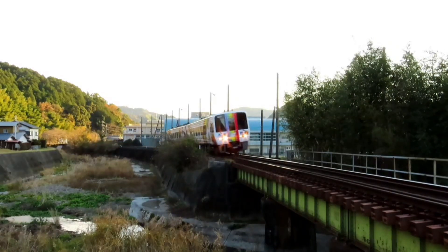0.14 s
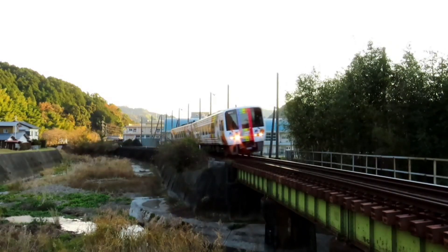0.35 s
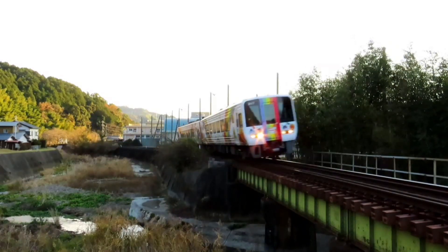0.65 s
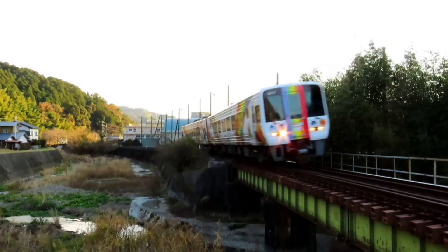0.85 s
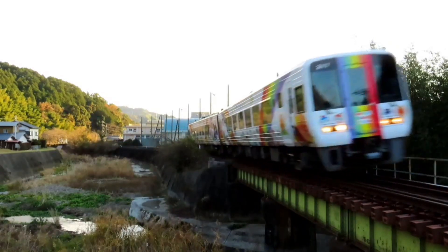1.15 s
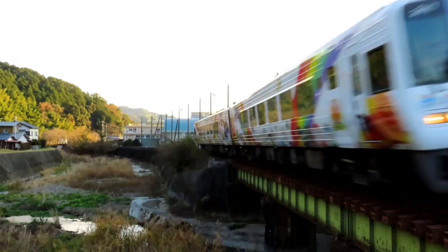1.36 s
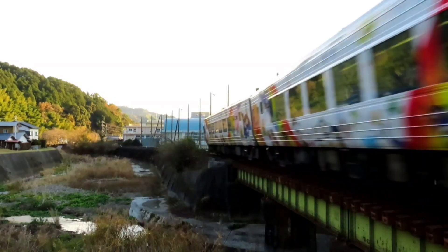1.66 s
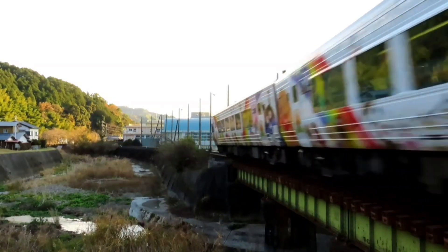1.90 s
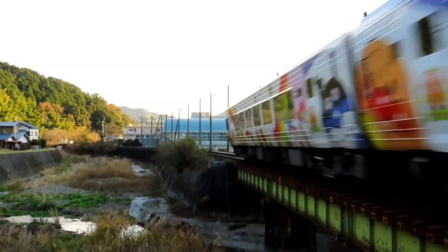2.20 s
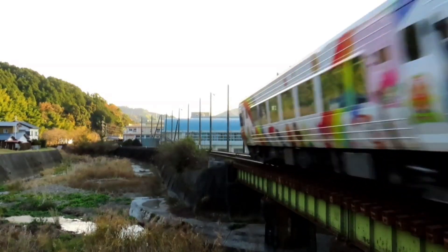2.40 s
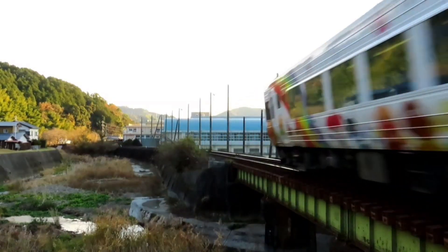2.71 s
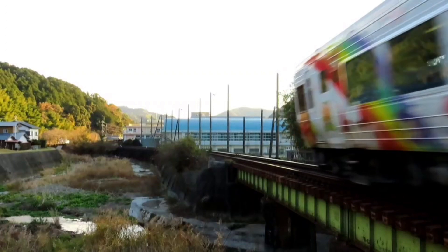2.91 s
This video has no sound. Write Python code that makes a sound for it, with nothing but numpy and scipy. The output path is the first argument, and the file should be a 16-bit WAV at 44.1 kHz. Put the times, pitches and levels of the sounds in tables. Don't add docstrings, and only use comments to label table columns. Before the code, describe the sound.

A diesel train approaches with rolling roar, low exhaust drone and thin, very high turbo hiss and whistle. Around 0.5 seconds the rail sings metallically; from 0.7 seconds heavy wheel knocks come about ten a second, with gritty clacks and hollow girder booms. It passes close on the right, loudest around 0.7 to 1.8 seconds, then engine and hiss fade while sharper clatter continues, weakening until 3 seconds.

```python
import sys
import numpy as np
from scipy import signal
from scipy.fft import rfft, irfft
from scipy.io import wavfile

SR = 44100
rng = np.random.default_rng(int(sys.argv[2]) if len(sys.argv) > 2 else 0)


def natural_amplitude(level_db):
    exponent = np.asarray(level_db, float) / 20
    return 10 ** exponent


def waveform_to_disk(signal):
    frames = np.transpose(np.atleast_2d(signal))
    scaled = np.clip(frames, -1, 1) * 32767
    samples = np.round(scaled).astype(np.int16)
    wavfile.write(sys.argv[1], SR, samples)


N = 134505
TIME_S = np.arange(N) / SR


def rms_one(x):
    return x / np.sqrt(np.mean(x ** 2) + 1e-20)


def in_time(rows):
    s, *columns = np.transpose(rows)
    return [np.interp(TIME_S, s, c) for c in columns]


def at_hz(points, hz):
    table_hz, table_db = np.transpose(points)
    return np.interp(np.log(hz), np.log(table_hz), table_db)


def drift(rate_hz):
    r = np.exp(-80 * np.pi * rate_hz / SR)
    slow = signal.lfilter([1], [1, -2 * r, r * r], rng.standard_normal(N // 40 + 2002))[2000:]
    return np.interp(np.arange(N) / 40, np.arange(len(slow)), rms_one(slow))


def coloured(x, spectrum):
    hz = np.maximum(np.fft.rfftfreq(N, 1 / SR), 1)
    low = np.minimum(hz / spectrum[0][0], 1) ** 2
    high = np.minimum(spectrum[-1][0] / hz, 1) ** 2
    return irfft(rfft(x) * natural_amplitude(at_hz(spectrum, hz)) * low * high, N)


def noise(spectrum, flicker_db):
    return rms_one(coloured(rng.standard_normal(N) * natural_amplitude(flicker_db * drift(7.5)), spectrum))


def resonant(table, patchy_db, rate_hz, passes=1):
    out = 0
    for hz, width_hz, db in table:
        r = np.exp(-np.pi * width_hz / SR)
        x = rng.standard_normal(N + 4000)
        for _ in range(passes):
            x = signal.lfilter([1, 0, -1], [1, -2 * r * np.cos(2 * np.pi * hz / SR), r * r], x)
        out = out + natural_amplitude(db + patchy_db * drift(rate_hz)) * rms_one(x[4000:])
    return rms_one(out)


# pitch_hz, level_db
TURBO_HISS = [(3530, -50), (6000, -30), (9500, -14), (11500, -10), (12200, -4), (13300, -2), (13900, 1),
              (14300, 3)]
# pitch_hz, width_hz, level_db
WHISTLES = [(14185, 25, -2), (13950, 120, -5), (12700, 40, -7)]


def turbo(level_db, abeam):
    patchy_db = 2.5
    whistle = resonant(WHISTLES, patchy_db, rate_hz=2.9, passes=2)
    opposed = natural_amplitude(level_db) * (noise(TURBO_HISS, flicker_db=1.5) + natural_amplitude(-3) * whistle)
    whistle = resonant(WHISTLES[:2], patchy_db, rate_hz=5, passes=2)
    alike_db = level_db - 7 - 10 * abeam + 1.5 * drift(8)
    alike = natural_amplitude(alike_db) * (noise(TURBO_HISS, flicker_db=1.5) + .9 * whistle)
    return opposed, alike


# time_s, firing_tone_db, second_order_db, body_boom_db
ENGINE = [(0, -21.5, -29.5, -24), (.22, -18, -23.5, -23), (.36, -24.5, -27.5, -22.5),
          (.46, -22, -28, -21.5), (.55, -29, -33, -18), (.7, -18, -32, -22.5), (.88, -33, -28, -23),
          (1.08, -29, -19.5, -23), (1.3, -24.5, -20.5, -24.5), (1.55, -27.5, -28, -27),
          (1.8, -31, -38, -23.5), (2.08, -44, -34, -31.5), (2.25, -28.5, -22, -19.5),
          (2.5, -40, -54, -32.5), (2.85, -43, -29, -28), (3.05, -36, -40.5, -40)]


def engine():
    firing_db, second_db, boom_db = in_time(ENGINE)
    firing_hz = 84.3 * (1 + .01 * drift(6))
    turn = 2 * np.pi * np.cumsum(firing_hz) / SR
    tones = natural_amplitude(firing_db + 0.76 * drift(7.7)) * np.sin(turn)
    tones += natural_amplitude(second_db + 1.3 * drift(5.5)) * np.sin(2 * turn + 0.49 * drift(18.5))
    ninth_db = -34 - 40 * np.maximum(TIME_S - .5, 0) + 1.5 * drift(9)
    tones += natural_amplitude(ninth_db) * np.sin(9 * turn)
    body = [(84.0, 55, -2), (111.8, 18.6, 3.0), (132.0, 62, -1.5), (153.5, 60, 0.5)]
    boom = natural_amplitude(boom_db) * resonant(body, patchy_db=1.0, rate_hz=11.0, passes=2)
    throb_db = firing_db - 12 - 13 * np.clip(TIME_S - .7, 0, 1)
    throb = natural_amplitude(throb_db) * resonant([(29.6, 14, 1), (49.7, 41, 4)], patchy_db=2, rate_hz=4, passes=2)
    return np.sqrt(2) * tones + boom + throb


# time_s, level_db
SINGING = [(0, -45), (.45, -27.5), (.54, -19), (.6, -17), (.65, -17), (.7, -20), (.8, -21.5), (1.2, -25),
           (1.9, -27.5), (3.05, -32.5)]
# pitch_hz, width_hz, level_db
RAIL = [(998, 23.5, 1.5), (1112, 59, 3), (1315, 74, -2), (1600, 155, -7.5), (1920, 230, -7.5)]


def singing_rail():
    level_db, = in_time(SINGING)
    return natural_amplitude(level_db - 1) * resonant(RAIL, patchy_db=2.0, rate_hz=18.0)


# time_s, roar_db, girder_load_db
ROLLING = [(0, -30, -32), (.16, -28, -35), (.27, -24.5, -52), (.42, -27, -26.5), (.56, -27.5, -17.5),
           (.72, -36, -18), (1.08, -28, -18), (1.28, -30, -18.5), (1.5, -34.5, -17), (1.75, -29, -20),
           (2.08, -29, -21), (2.26, -26.5, -19.5), (2.45, -31, -20), (2.66, -35.5, -25), (2.88, -30.5, -26),
           (3.05, -31.5, -38)]
# pitch_hz, level_db
RUMBLE = [(15, -45), (25, -40), (54, -17), (96, -8.5), (140, -16.5), (176, -1), (248, -7), (345, 0.5),
          (900, -11), (1170, -54), (1980, -120)]
# pitch_hz, width_hz, level_db
GIRDERS = [(111, 23, -12), (153.6, 23, -1), (216, 16, -1.5), (300, 22, 0), (340, 7.3, 6), (405, 28, -1),
           (458, 6.3, -21), (544, 37, 3)]


def bridge():
    _, load_db = in_time(ROLLING)
    rumble = natural_amplitude(load_db + 0.5) * noise(RUMBLE, flicker_db=0.0)
    return rumble + natural_amplitude(load_db - 5) * resonant(GIRDERS, patchy_db=0.5, rate_hz=4.5)


# centre_s, pitch_hz, level_db
PLATES = [
    (.6, 305, -10.5),
    (0.801, 299, -10),
    (0.941, 300, -12.5),
    (1.032, 338, -11),
    (1.216, 396, -10),
    (1.411, 561, -15.5),
    (1.861, 370, -12),
    (2.338, 361, -10),
    (2.52, 375, -17.5),
    (2.771, 380, -15),
]


def plates():
    swell_s = 0.017
    waver, rough = 0.65 * drift(35.0), natural_amplitude(2.0 * drift(42.0))
    out = np.zeros(N)
    for s, hz, db in PLATES:
        swell = np.exp(-.5 * ((TIME_S - s) / swell_s) ** 2)
        out += natural_amplitude(db - 0.5) * swell * np.sin(2 * np.pi * hz * TIME_S + waver)
    return rough * out


# pitch_hz, level_db
ROAR = [(240, 0.5), (400, 0), (738, -1.5), (815, -3), (1420, -8), (1910, -9), (3700, -19.5), (5300, -31),
        (10700, -38), (12000, -44), (15600, -83), (22000, -120)]


def wheel_roar():
    roll_db, _ = in_time(ROLLING)
    roar = natural_amplitude(roll_db + 4.5) * noise(ROAR, flicker_db=1.0)
    air = signal.sosfilt(signal.butter(2, 8000, "high", fs=SR, output="sos"), roar)
    screened = np.clip((TIME_S - 1.2) / .2, 0, 1)
    return roar - .45 * screened * air


# start_s, peak_db, girder_share_db, sharp_edge_db
KNOCKS = [(0.2, -8, 6, -9), (0.297, -12, -7, -10), (0.475, -8.5, -1.5, -1), (0.583, -8, -19, -4),
          (0.691, 1, -18, -3), (0.793, -0.5, -24, -10), (0.896, 1.5, -31, -8), (0.99, 1.5, -12, -10),
          (1.1, -1.5, -29, -6), (1.191, -7.5, 7.5, 5), (1.31, -4, -1.5, -1.5), (1.401, -3.5, -11, -2),
          (1.501, -2, -17, -10), (1.61, -1.5, -13, -2), (1.71, 2.5, -7, -16), (1.815, 1.5, -10.5, -11),
          (1.852, -22, 8, -13), (1.923, -13, 0, 8), (2.03, -8, 1, -2), (2.12, -15, 8.5, -5),
          (2.201, -4.5, 4.5, 2), (2.303, -12, 4, 12.5), (2.407, -6, 4, 2), (2.509, -8, 8, -2),
          (2.616, -11.5, 7.5, 11), (2.726, -6.5, 3, 1.5), (2.835, -16, 6, 1)]


def blows(level_db, rise_s, fall_s):
    clicks = np.zeros(N)
    clicks[(np.array(KNOCKS)[:, 0] * SR).astype(int)] = natural_amplitude(level_db)
    t = np.arange(SR // 3) / SR
    shape = (1 - np.exp(-t / rise_s)) * np.exp(-t / fall_s)
    power = signal.fftconvolve(clicks ** 2, (shape / shape.max()) ** 2)[:N]
    return np.sqrt(np.maximum(power, 0))


# pitch_hz, level_db
KNOCK = [(290, -25), (500, 4.5), (1300, -3.5), (1530, -7.5), (1990, -7), (2310, -14), (2600, -15.5),
         (12000, -76), (15600, -91), (22000, -120)]


def joints():
    _, peak_db, girder_db, edge_db = np.transpose(KNOCKS)
    crack = blows(peak_db + edge_db - 14, rise_s=.003, fall_s=.007)
    swell = blows(peak_db - 18, rise_s=0.028, fall_s=0.041)
    thud = blows(peak_db + girder_db - 15.5, rise_s=0.0022, fall_s=0.03)
    damped = [(hz, 3.0 * width_hz, db) for hz, width_hz, db in GIRDERS[2:]]
    knock = (crack + swell) * noise(KNOCK, flicker_db=0.5)
    return knock + thud * resonant(damped, patchy_db=0.5, rate_hz=18.0)


# start_s, peak_db, brightness_db
CLACKS = [(.109, -16, 1), (.167, -14, -1), (0.206, -6, -1), (.213, -16, 5), (.299, -21, 12),
          (.373, -13, -4), (.526, -17, -16), (.67, -4, -20), (0.682, -12.5, 4), (.699, -12, -6.5),
          (0.713, -4, -10.5), (.76, -2, -20), (.792, -1, -21), (.894, -5, -9), (1.001, -13, -3),
          (1.1, -10, -2), (1.135, -3.5, -9), (1.192, -4, -10), (1.208, -0.5, -11), (1.215, -3, -7),
          (1.226, -9, -11), (1.311, -2, -17), (1.334, 1, -20.5), (1.405, -1.5, -17), (1.429, -7.5, -21),
          (1.5, -9, -10), (1.537, -7, -18), (1.609, -0.5, -16), (1.708, -5, -17), (1.816, -5, -11),
          (1.828, -6, -7), (1.853, 1, -18), (1.923, -2, -12), (2.033, -7, -10), (2.121, -14, -15),
          (2.147, -3, -29), (2.203, -14, -11), (2.304, -2, -14), (2.33, -14, -14), (2.407, -8, -8),
          (2.51, -6, -6), (2.586, -4, -19), (2.619, -3, -18.5), (2.626, -4, -16), (2.729, -8, -18),
          (2.744, -7.5, -18), (2.836, -4, -13)]
# pitch_hz, level_db, t60_s
TREAD = [(428, 0, 0.054), (621, -3.5, 0.043), (880, -3, 0.042), (1253, -4.5, 0.062)]
# pitch_hz, level_db, t60_s
TREAD_HIGH = [(1600, 0, .015), (1950, -1, .014), (2350, -2, .012), (2850, -4, .01), (3450, -5, .009),
              (4150, -7, .008), (5000, -10, .007), (6000, -14, .006)]


def clacks():
    low_db, high_db, detune = -11, -10.5, 0.081
    out, t = np.zeros(N + SR), np.arange(SR // 14) / SR
    grit_t = t[:SR // 30]
    for s, db, bright_db in CLACKS:
        modes = [(hz, db + m + low_db, t60) for hz, m, t60 in TREAD]
        modes += [(hz, db + bright_db + m + high_db, t60) for hz, m, t60 in TREAD_HIGH]
        rings = np.zeros(len(t))
        for hz, mode_db, t60 in modes:
            tune, force, sign = rng.standard_normal(3)
            fade = natural_amplitude(mode_db + 2 * force - 60 * t / t60)
            rings += fade * np.sin(2 * np.pi * hz * (1 + detune * tune) * t) * np.sign(sign)
        grit = rng.standard_normal(len(grit_t)) * np.exp(-grit_t / .008)
        hit = signal.fftconvolve(rings, np.r_[.7, .08 * grit])
        start = int(s * SR)
        out[start:start + len(hit)] += hit
    return out[:N]


# pitch_hz, left_lead_rad
LEAD = [(0, 0), (2500, -.25), (4000, -.75), (6000, -1.7), (9400, -3.1), (22050, -3.14)]
# pitch_hz, left_minus_right_db
SHADOW = [(60, 0), (250, -.9), (700, -2.2), (1500, -3), (4000, -2), (9000, 0)]


def at_ports(train, abeam):
    hz = np.fft.rfftfreq(N, 1 / SR)
    lead_rad = np.interp(hz, *np.transpose(LEAD))
    port = natural_amplitude(at_hz(SHADOW, hz + 1) / 2) * np.exp(.5j * lead_rad)
    return [(1 - abeam) * train + abeam * irfft(rfft(train) * p, N) for p in (port, 1 / port)]


# pitch_hz, share_db
SCATTER = [(30, -30), (80, -37.5), (300, -28), (1200, -25.5), (2500, -19.5), (5000, -28), (9000, -8.5),
           (14000, -8.5)]


def echoes(train, scatter_db):
    hz = np.fft.rfftfreq(N, 1 / SR)
    colour = natural_amplitude(at_hz(SCATTER, hz + 1))
    stir = natural_amplitude(scatter_db + 3 * drift(7))
    return [irfft(rfft(np.roll(train, lag)) * colour, N) * stir for lag in (700, 1190)]


# time_s, abeam_share (0-1), turbo_hiss_db, scatter_db
BEARING = [(0, 0.4, -39, 7), (.12, 0.4, -34, -4), (.45, 0.32, -41.5, 6), (.8, 0.27, -38, -4),
           (1.15, 0.35, -41, -2), (1.5, 0.6, -44, -9), (1.8, 0.9, -40, 7), (2.15, 0.84, -41, 3.5),
           (2.5, 0.95, -54, 4.5), (3.05, 0.78, -63, 5.5)]


def scene():
    abeam, turbo_db, scatter_db = in_time(BEARING)
    abeam = np.clip(abeam, 0, 1)
    train = engine() + singing_rail() + bridge() + plates() + wheel_roar() + joints() + clacks()
    left, right = at_ports(train, abeam)
    echo_left, echo_right = echoes(train, scatter_db)
    opposed, alike = turbo(turbo_db, abeam)
    return np.array([left + echo_left + alike + opposed, right + echo_right + alike - opposed])


def top_cut(x):
    return signal.sosfilt(signal.butter(12, 14470, fs=SR, output="sos"), x)


def record(dry):
    top = .97
    knee = .75 * top
    room = top - knee
    over = np.maximum(np.abs(dry) - knee, 0)
    rounded = dry - np.sign(dry) * (over - room * np.tanh(over / room))
    return top_cut(rounded)


dry = scene()
out = record(dry)
waveform_to_disk(out)
```